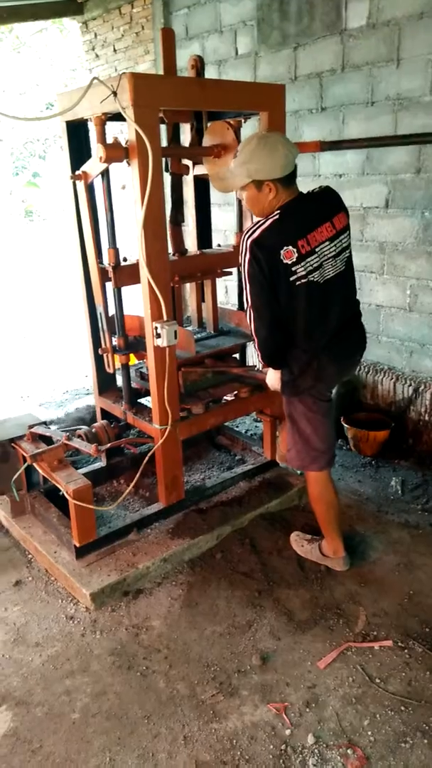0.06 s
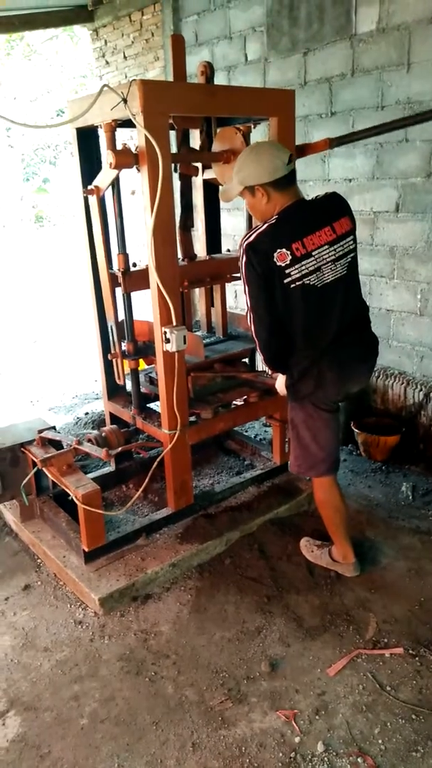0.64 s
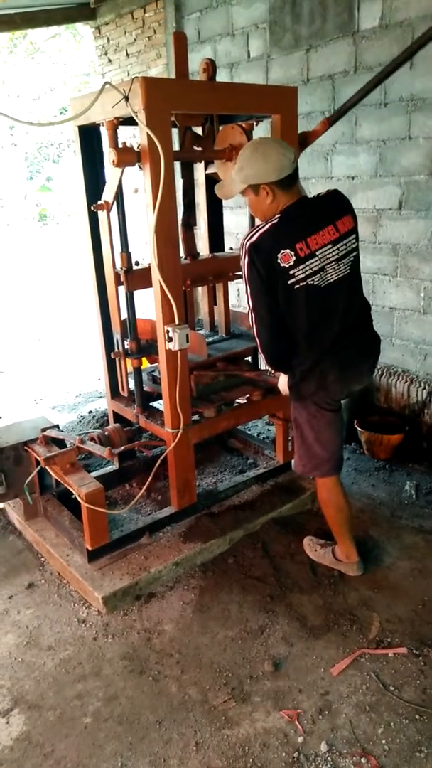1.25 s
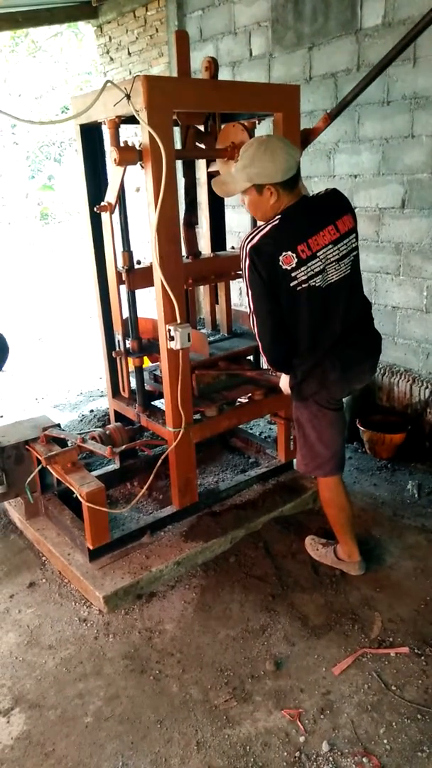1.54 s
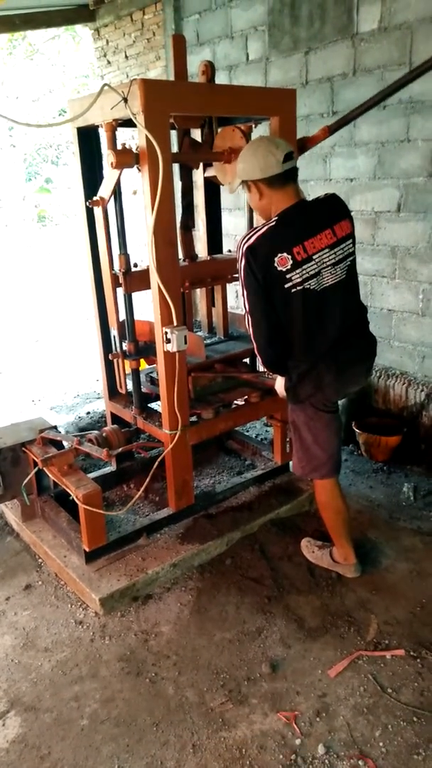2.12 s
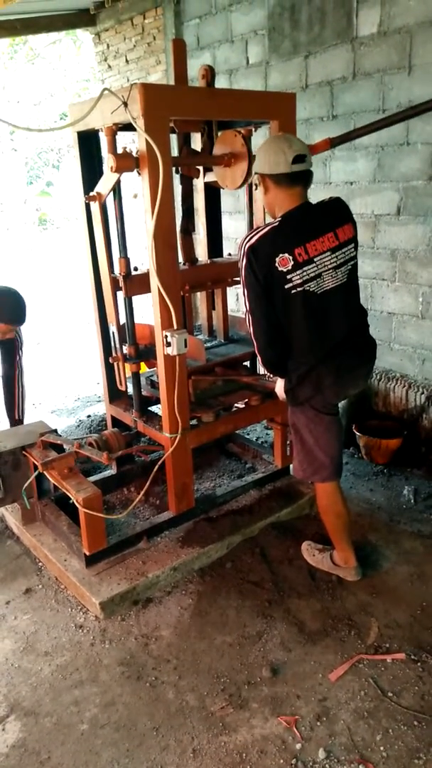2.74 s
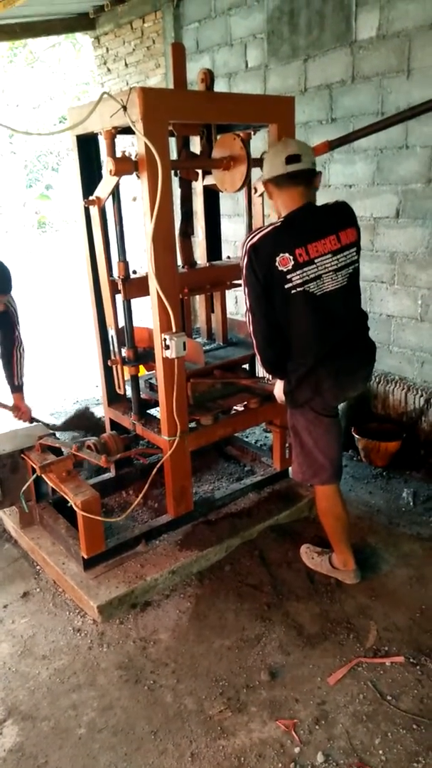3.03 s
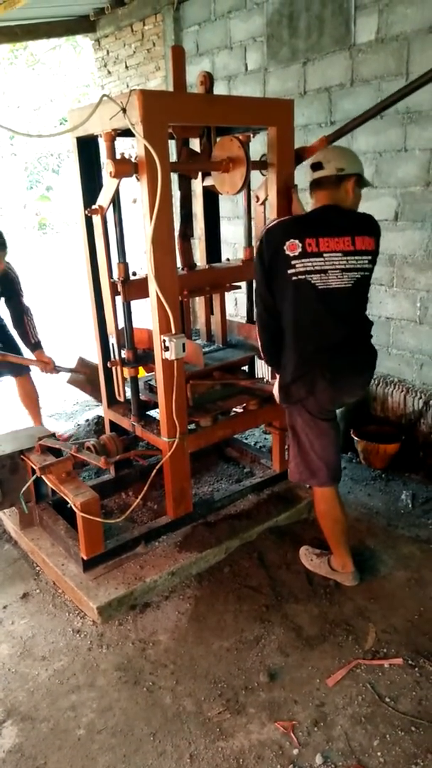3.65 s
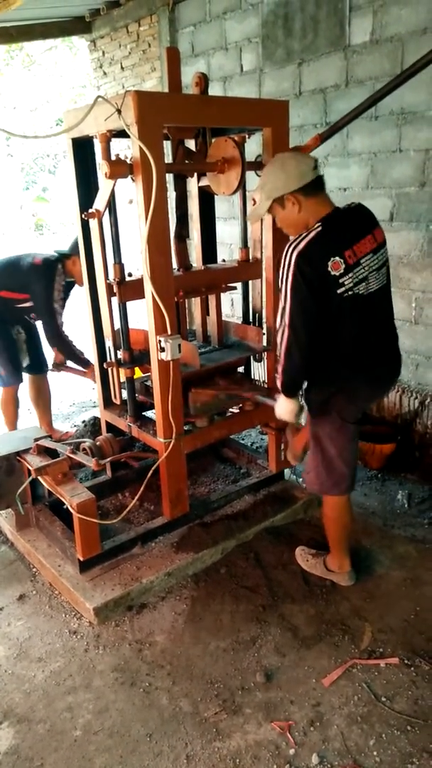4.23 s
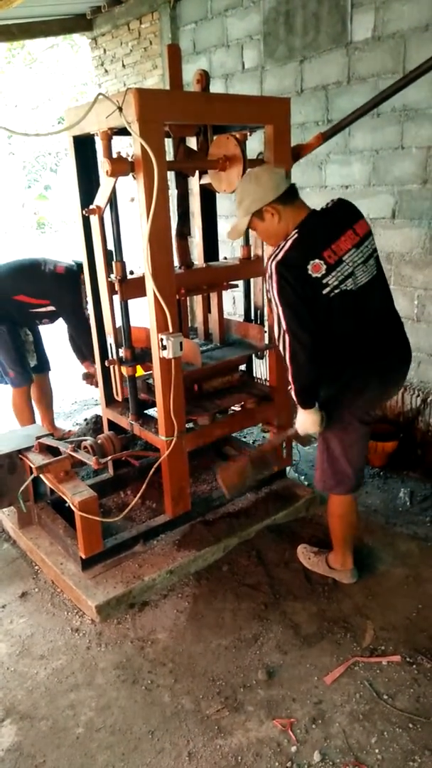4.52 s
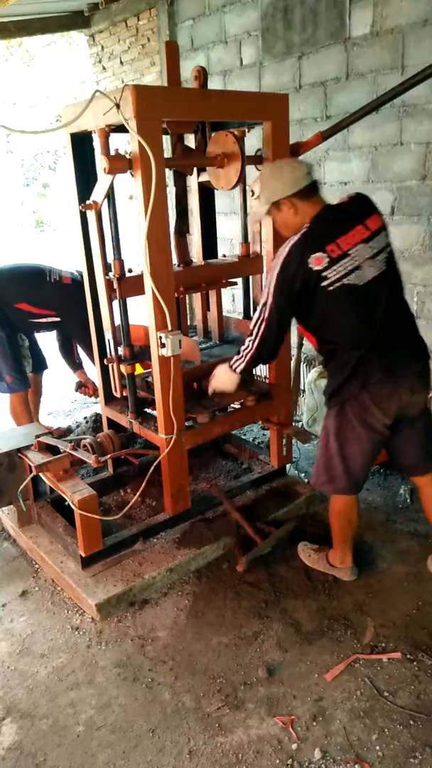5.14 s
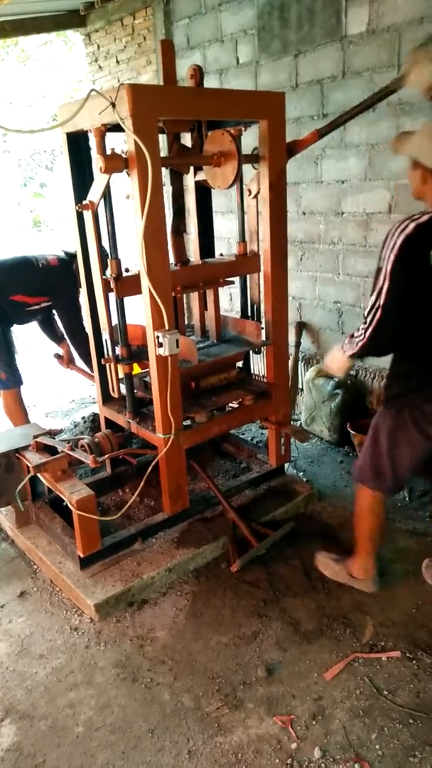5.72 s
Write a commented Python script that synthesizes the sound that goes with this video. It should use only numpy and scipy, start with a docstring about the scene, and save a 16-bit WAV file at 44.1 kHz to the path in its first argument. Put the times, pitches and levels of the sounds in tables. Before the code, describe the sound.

At the start a lever squeaks faintly and steel scrapes on gritty steel, ending in a sharp clank at about 0.45 seconds. Straight away a concrete block machine begins to vibrate: a loud, fast, even rattling buzz of clashing steel parts, with a deep drumming hum and a ringing frame. It speeds up slightly in the first half second, then holds steady, with occasional brighter clangs and a loose plate jangling around 3 seconds. At about 4.5 seconds the shaking dies, leaving a few slowing, fading knocks until 5.1. At 5.2 a hand tool thuds on the earth floor and bounces. Faint shovel scrapes, sandal steps and crunching grit continue to about 5.8 seconds. Soft outdoor noise lies under everything, the shed adds a short echo, and the loudest peaks overload the phone microphone.

```python
"""A concrete block machine shakes in a shed: its off-centre shaft throws a steel mould against a table many
times a turn, so loose parts clatter, the table drums and the frame rings. Before it starts, steel scrapes
and a lever squeaks and clanks. It runs for four seconds and coasts down in a few slowing knocks. Then a
hand tool drops, and someone shovels and steps back. Soft outdoor noise lies under it all, and the loudest
peaks overload the phone."""
import sys
import numpy as np
from scipy import signal
from scipy.fft import rfft, irfft, next_fast_len
from scipy.io import wavfile
from scipy.ndimage import uniform_filter1d

SR = 44100
rng = np.random.default_rng(int(sys.argv[2]) if len(sys.argv) > 2 else 0)


def put_to_file(sound):
    """Save the sound as 16-bit audio at rate SR, in the file named by the first command-line argument."""
    columns = np.atleast_2d(sound).T  # one column per channel
    safe = np.clip(columns, -1, 1)
    whole_steps = np.round(safe * 32767)
    wavfile.write(sys.argv[1], SR, whole_steps.astype(np.int16))


N = 254456
TIME = np.arange(N) / SR
RING_TIME = TIME[:SR // 2]  # half a second for a struck body to ring

BOUNCE_S, MOTOR_OFF_S, SETTLE_S = 0.53, 4.13, 4.531  # bouncing starts, power is cut, bouncing dies
ATTACK_S, RELEASE_S = 0.044, 0.063  # how quickly the shaking comes and goes
START_HZ, RUN_HZ = 21.756, 25.86  # shaft turns per second
SPIN_UP_HZ_PER_S, COAST_HZ_PER_S = 9.0, 8.3
HUM_DB, HUM_DB_PER_HZ = -26, -3.5  # hum at full speed, and its change for each turn per second less

# How hard the mould shakes. Each row: time in seconds, clatter in dB, its extra treble in dB, drum in dB.
SHAKING = [(0.53, -13.5, 0.5, -27.5), (0.66, -12, 0.5, -23), (1.0, -12.5, -0.5, -21.5),
           (1.22, -13.5, 0, -27.5), (1.33, -12.5, 1.5, -24.5), (1.5, -13.5, 0, -21.5),
           (1.62, -14, 0.5, -21.5), (1.69, -13, 0.5, -21.5), (2.35, -11.5, 0, -25.5), (2.41, -13, -2, -18),
           (2.48, -13, -0.2, -22), (3.65, -13, -0.8, -24.5), (4.05, -11, -0.2, -20),
           (4.43, -12.5, 1, -24.5), (4.54, -13.5, -0.5, -25.5)]
def vibrator():
    """The mould hammers on the table: loose parts clash, the frame clangs, the table drums and hums."""
    speed = shaft_speed()
    turns = np.cumsum(speed * (1 + .0015 * drift(5))) / SR
    bouncing = hold(BOUNCE_S, SETTLE_S, ATTACK_S, RELEASE_S)
    times, clatter_db, treble_db, drum_db = np.transpose(SHAKING)
    shake = bouncing * undb(np.interp(TIME, times, clatter_db) + .35 * drift(13))
    drum = bouncing * undb(np.interp(TIME, times, drum_db) + 0.5 * drift(14))
    clatter = undb(2) * rattle(turns, shake, parts=5) + undb(1) * chimes(turns, shake)
    treble = colour(clatter, [(4000, 0), (20000, 0)])
    clatter += (undb(np.interp(TIME, times, treble_db)) - 1) * treble
    hum_gain = bouncing * undb(HUM_DB + HUM_DB_PER_HZ * (RUN_HZ - speed))
    table = undb(-1.5) * drumming(turns, drum, corners=3) + hum_gain * hum(turns)
    return clatter + wall_clang(turns) + frame_clang() + table


def shaft_speed():
    """Turns per second: the shaft speeds up, runs steadily, then coasts with the motor off."""
    rising = START_HZ + SPIN_UP_HZ_PER_S * (TIME - BOUNCE_S)
    slowing = COAST_HZ_PER_S * np.maximum(TIME - MOTOR_OFF_S, 0)
    return np.maximum(np.minimum(rising, RUN_HZ) - slowing, 1)


def contacts(turns, per_turn, jitter_s, scatter_db, lift_db):
    """Blows return at the same shaft angles, never quite alike, hardest at both ends of the stroke."""
    angles = (np.arange(per_turn) + rng.uniform(0, 1, per_turn)) / per_turn
    at_turn = (np.arange(round(30 * N / SR))[:, None] + angles).ravel()  # more turns than needed
    late, hard = rng.standard_normal((len(at_turn), 2)).T
    stroke_db = lift_db * (np.cos(4 * np.pi * at_turn) + .5 * np.cos(2 * np.pi * at_turn))
    sign = np.resize(rng.choice([-1, 1], per_turn), len(at_turn)) * (at_turn < turns[-1])
    times = np.interp(at_turn, turns, TIME) + jitter_s * late
    return clicks(times, sign * undb(scatter_db * hard + stroke_db))


# The tone of the mould's steel plates. Each row: frequency in Hz, level in dB.
PLATE_COLOUR = [(300, -32), (520, -9), (660, -5), (1000, -4.5), (1350, -5.5), (1800, -3.5), (2800, -5.5),
                (4200, -4.5), (5200, -5), (6100, -6), (6900, -11.5), (7600, -21), (9000, -22.5)]
def rattle(turns, shake, parts):
    """Several loose parts each clash in their own pattern and from their own place."""
    out = 0
    for _ in range(parts):
        force = contacts(turns, per_turn=7, jitter_s=.0015, scatter_db=3, lift_db=1.5)
        plates = wash(PLATE_COLOUR, t60=0.15, shed_db=-4.5, shed_t60=0.45, shared=0.14)
        out += driven(force, shake, plates + undb(-8) * ring(MOULD_NOTES, spread=1.3))
    return out / np.sqrt(parts)


# The notes of the mould's loose parts. Each row: pitch in Hz, level in dB, ring time in seconds.
MOULD_NOTES = [(955, -19, .06), (1085, -19.5, .045), (1135, -18.5, .045), (1400, -21, .06),
               (1585, -22, .06), (1700, -21, .05), (1795, -22, .05), (2075, -18.5, .05), (2322, -20.5, .09),
               (2726, -18, .09), (2814, -21, .08), (2905, -21, .07), (3076, -19.5, .07), (3323, -23, .08),
               (3540, -21, .05), (3649, -20.5, .11), (4520, -20, .05), (5060, -22, .05), (5704, -22, .08),
               (5945, -20, .03)]
def chimes(turns, shake):
    """Each loose part rings on its own note, now clearer, now fainter, as it shifts about."""
    out = 0
    for hz, db, t60 in MOULD_NOTES:
        force = contacts(turns, per_turn=4, jitter_s=.002, scatter_db=4, lift_db=1.5)
        shifting = undb(db + 2.5 * drift(5))
        out += driven(force, shake * shifting, ring([(hz, 0, t60)], spread=1.58))
    return out


# The table's deep tone. Each row: frequency in Hz, level in dB.
TABLE_COLOUR = [(25, -37), (50, -29), (75, -18), (135, -8), (170, -5), (205, -21), (245, 7.5), (320, 2),
                (400, 5.5), (480, 1), (570, -1), (700, -37)]
# Its clearest notes. Each row: pitch in Hz, level in dB, ring time in seconds.
TABLE_NOTES = [(246, 0, .16), (284, -2, .16), (387, -1, .16), (572, -1, .14)]
def drumming(turns, drum, corners):
    """The heavy blows shake the table at its corners."""
    out = 0
    for _ in range(corners):
        force = contacts(turns, per_turn=6, jitter_s=0.0011, scatter_db=3, lift_db=6)
        boom = wash(TABLE_COLOUR, t60=0.079, shed_db=-5, shed_t60=0.28, shared=0.95)
        out += driven(force, drum, boom + undb(-8) * ring(TABLE_NOTES, spread=0.58))
    return out / np.sqrt(corners)


# The tones in the table's hum. Each row: multiple of the shaft speed, level in dB.
HUM_TONES = [(3, -7.3), (4, -15), (5, -13), (6, -15), (7, -7), (8, -13), (9, -4), (10, -4), (11, -5),
             (12, -6), (13, -4), (14, -5), (15, -3), (16, -7), (17, -8), (21, -10), (22, -8)]
# When one tone stands out. Each row: its multiple, start in seconds, length in seconds.
HUM_SWELLS = [(11, 0.95, 1.1), (9, 1.5, 1.5), (21, 2.25, 1.2), (13, 2.35, 0.5), (14, 2.95, 0.45),
              (15, 3.8, 0.22), (11, 3.85, 0.25)]
def hum(turns, swell_db=7.5):
    """The table hums at multiples of the shaft speed; at listed times, single tones swell."""
    out = 0
    for multiple, db in HUM_TONES:
        swell = sum(hold(start, start + length, .08, .08)
                    for which, start, length in HUM_SWELLS if which == multiple)
        gain = undb(db + swell_db * swell + 2.2 * drift(12))
        out += gain * np.sin(2 * np.pi * (multiple * turns + rng.random()))
    return unit(out)


# The notes of the mould's thin walls. Each row: pitch in Hz, level in dB, ring time in seconds.
WALL_NOTES = [(2726, -1, .13), (2814, 0, .13), (2905, -1.5, .1), (3076, -4, .08), (3540, -5, .08),
              (3649, -4, .12)]
# When they clang. Each row: start in seconds, length in seconds, level in dB.
WALL_CLANGS = [(0.58, .42, -22.5), (1.36, .18, -24.5), (1.88, .25, -24.5), (3.42, .35, -22),
               (4.2, .36, -21.5)]
def wall_clang(turns):
    """Now and then the mould's walls strike the guides a few times a turn and ring brightly."""
    force = contacts(turns, per_turn=4, jitter_s=.0015, scatter_db=4, lift_db=2)
    striking = strokes(WALL_CLANGS, slope_db_per_s=0, edge_s=.05)
    return driven(force, striking, ring(WALL_NOTES, spread=1.2))


# The steel frame's notes. Each row: pitch in Hz, level in dB, ring time in seconds.
FRAME_NOTES = [(776, 0, .5), (2318, -20, .5), (2885, -22, .3), (3063, -17, .15), (3500, -21, .25)]
# When it rings out or is held back. Each row: start in seconds, length in seconds, change in dB.
FRAME_CHANGES = [(0.675, .08, 8.5), (0.82, .11, 2), (1.01, .09, -5), (1.32, .15, 6.5), (1.62, .05, -6),
                 (1.76, .24, 3), (2.61, .25, -7), (3.14, .18, 2.5), (3.51, .11, 4.5), (3.81, .04, 6.5),
                 (4.0, .23, 5.5), (4.34, .11, 3.5)]
def frame_clang(start_s=0.462, level_db=-25.5):
    """The frame rings roughly, louder while the mould catches it, fainter while the mould leans on it."""
    damping = np.exp(-RING_TIME / .09)  # the mould rests against the frame
    tone = play(grains(300, 1.6), ring(FRAME_NOTES, spread=0.16) * damping)
    strength = np.sqrt(uniform_filter1d((tone ** 2).mean(0), SR // 20) + np.mean(tone ** 2) / 20)
    change_db = sum(db * hold(start, start + length, .022, .022) for start, length, db in FRAME_CHANGES)
    shaken = undb(level_db + change_db + 0.93 * drift(17)) * hold(start_s, SETTLE_S, 0.017, RELEASE_S)
    flicker = undb(1.8 * drift(45) - .3)
    return tone / strength * flicker * shaken


# A loose plate's notes. Each row: pitch in Hz, level in dB, ring time in seconds.
JANGLE_NOTES = [(1490, -5, 0.078), (1588, 4.5, 0.056), (1646, -2, 0.082), (1750, 1, 0.038)]
# When it jangles. Each row: start in seconds, length in seconds, level in dB.
JANGLE_TIMES = [(2.7, 0.56, -22.5), (3.62, 0.37, -25)]
def jangle():
    """One plate works loose and buzzes along with the mould."""
    taps = grains(per_s=400, scatter_db=8.4)
    loose = strokes(JANGLE_TIMES, slope_db_per_s=-4, edge_s=0.12)
    return driven(taps, loose, ring(JANGLE_NOTES, spread=1))


# The last knocks. Each row: start in seconds, clatter level in dB, clatter length in seconds,
# frame ring level in dB, seconds until the ring is damped.
LAST_KNOCKS = [(4.654, -18, 0.01, -18.5, 0.032), (4.733, -15.5, 0.008, -21, 0.067),
               (4.821, -32, 0.011, -30, 0.03), (4.914, -29.5, 0.03, -31, 0.07),
               (5.017, -43, 0.022, -38.5, 0.029), (5.124, -48.5, 0.012, -36.5, 0.015)]
# The tone of the seat that the mould falls on. Each row: frequency in Hz, level in dB.
SEAT_COLOUR = [(200, -10), (500, -8.5), (820, 5), (1200, -4), (1900, -3.5), (2400, 7.5), (3200, 5.5),
               (4200, 4), (5200, 2), (6200, 3), (7200, -7), (9000, -20)]
def knocks():
    """As the shaft slows, the mould falls in single knocks that crack, clatter and ring the frame."""
    bursts, blows, clangs = 0, 0, 0
    for start, clatter_db, clatter_s, ring_db, ring_s in LAST_KNOCKS:
        bursts += undb(clatter_db) * hold(start, start + clatter_s, attack_s=0.00055, release_s=0.025)
        blows += clicks([start], [undb(clatter_db)])
        damping = np.exp(-np.maximum(RING_TIME - ring_s, 0) / 0.019)  # the mould stops the ring
        clangs += play(clicks([start], [undb(ring_db)]), ring(FRAME_NOTES, spread=0.1) * damping)
    seat = wash(SEAT_COLOUR, t60=0.046, shed_db=-14.5, shed_t60=0.39, shared=0.098)
    seat += undb(-12.5) * ring(MOULD_NOTES, spread=2.5)
    clatter = undb(0.5) * driven(grains(2500, 3.5), bursts, seat)
    crack = undb(1) * play(blows, seat)
    chatter = undb(2.2 * drift(110) - .3)  # the mould chatters against the ringing frame
    return clangs * chatter + crack + clatter


# The lever hits its stop. Each row: start in seconds, level in dB.
LEVER_HITS = [(0.453, -23), (0.4563, -13), (0.463, -20.5), (0.482, -23.5)]
# The lever's notes. Each row: pitch in Hz, level in dB, ring time in seconds.
LEVER_NOTES = [(776, 0, .2), (958, 7.5, 0.1), (1120, 5, .1), (1655, 3, .12), (1806, 6, 0.08),
               (2034, 11, 0.065), (2220, 9, 0.07), (3649, 0, .15)]
def lever_clank():
    """The lever clanks against its stop and jolts the machine's steel."""
    times, db = np.transpose(LEVER_HITS)
    plates = wash(PLATE_COLOUR, t60=0.17, shed_db=4.5, shed_t60=0.26, shared=0.17)
    body = undb(-7) * plates + undb(1.5) * ring(LEVER_NOTES, spread=0.86)
    return play(clicks(times, undb(db)), body)


# The whines of the lever's rod. Each row: pitch in Hz, level in dB compared with the squeak.
ROD_WHINES = [(645, -8), (1330, -13), (2460, -15)]
def lever_squeak(end_s=0.23, start_hz=1420, rise_hz_per_s=260):
    """The lever's pivot squeaks on a slowly rising note, and its rod sings along faintly."""
    pitch = (start_hz + rise_hz_per_s * np.minimum(TIME, end_s)) * (1 + .009 * drift(150))
    pivot = np.sin(2 * np.pi * np.cumsum(pitch) / SR)
    rod = sum(undb(db) * np.sin(2 * np.pi * hz * TIME + 0.54 * drift(66)) for hz, db in ROD_WHINES)
    gain = hold(0, end_s, .01, .02) * undb(-50.5 + 2.5 * drift(110))
    return np.sqrt(2) * (pivot + rod) * gain


# Pushes on the sliding steel. Each row: start in seconds, length in seconds, starting level in dB.
SLIDE_PUSHES = [(0.03, 0.072, -55), (0.276, 0.11, -34.5), (0.415, 0.059, -42)]
# The tone of its scrape. Each row: frequency in Hz, level in dB.
STEEL_COLOUR = [(100, -25), (200, -6), (320, 7), (500, -4), (950, 2), (1300, 1), (2000, -2), (2800, -6.5),
                (3900, -4), (4800, -8), (5800, -3.5), (7400, -11.5), (9000, -20)]
# Its notes. Each row: pitch in Hz, level in dB, ring time in seconds.
STEEL_NOTES = [(1680, 3, 0.035), (2050, -1, 0.046), (3030, -5, .06), (3880, -1, 0.046), (5580, 0, .052)]
def slide():
    """Steel slides on gritty steel, harder as each push goes on, and sings faintly."""
    pushing = strokes(SLIDE_PUSHES, slope_db_per_s=129, edge_s=0.012)
    singing = driven(grains(1100, 4.3), pushing, ring(STEEL_NOTES, spread=1))
    scraping = scrape(pushing, STEEL_COLOUR, grains_per_s=2600, scatter_db=3.7)
    return undb(-1) * scraping + undb(-9) * singing


# The tool lands and bounces. Each row: start in seconds, level in dB.
TOOL_HITS = [(5.2005, -21), (5.207, -25.5), (5.214, -26), (5.223, -22.5), (5.244, -30.5), (5.264, -31)]
# The tone of its thud. Each row: frequency in Hz, level in dB.
TOOL_COLOUR = [(100, -28), (200, -18), (260, -5), (380, -13), (540, 1), (720, -12), (1000, -8), (1400, -16),
               (2000, -14), (2800, -15), (3400, -30), (7000, -37)]
# Its notes. Each row: pitch in Hz, level in dB, ring time in seconds.
TOOL_NOTES = [(255, 1, .18), (453, -11, .08), (549, 1.5, .13), (641, -12, .12), (980, -10, .15),
              (1340, -7.5, .13), (1712, -12, .11), (2094, -18, .1), (2455, -18, .1), (2800, -19, .1)]
def dropped_tool():
    """A long-handled tool thuds on the earth floor and bounces."""
    times, db = np.transpose(TOOL_HITS)
    thud = wash(TOOL_COLOUR, t60=.09, shed_db=-19, shed_t60=.3, shared=.7)
    force = soften(clicks(times, undb(db)), contact_s=0.00025)
    return play(force, undb(-5) * thud + undb(-3.5) * ring(TOOL_NOTES, spread=0.61))


# Shovel strokes. Each row: start in seconds, length in seconds, starting level in dB.
DIGS = [(5.13, 0.12, -43), (5.32, 0.018, -42), (5.445, 0.1, -43.5), (5.62, 0.03, -44.5),
        (5.71, 0.07, -47.5)]
# Their tone. Each row: frequency in Hz, level in dB.
DIG_COLOUR = [(200, -5), (500, -10), (900, 7), (1400, -9), (1850, 10), (2300, -2), (3500, -11), (6000, -34),
              (8000, -42)]
def shovel():
    """A shovel scrapes through the concrete mix, easing off in each stroke."""
    digging = strokes(DIGS, slope_db_per_s=-32, edge_s=0.03)
    return scrape(digging, DIG_COLOUR, grains_per_s=900, scatter_db=4.8)


# Footsteps. Each row: start in seconds, level in dB.
FOOTFALLS = [(5.327, -42), (5.435, -39.5), (5.585, -41.5), (5.728, -60)]
# Their dull tone. Each row: frequency in Hz, level in dB.
EARTH_COLOUR = [(40, 6), (130, -4), (280, 12), (560, 1), (900, -15), (1700, -8), (3000, -11), (7000, -27)]
def steps():
    """Sandals pat the earth floor as the worker steps back."""
    times, db = np.transpose(FOOTFALLS)
    earth = wash(EARTH_COLOUR, t60=0.14, shed_db=-24, shed_t60=.3, shared=0.21)
    return play(soften(clicks(times, undb(db)), contact_s=.0002), earth)


# Crunches of grit. Each row: start in seconds, length in seconds, starting level in dB.
GRIT_CRUNCHES = [(5.21, 0.06, -50), (5.425, 0.085, -53), (5.725, 0.04, -58)]
# Their bright tone. Each row: frequency in Hz, level in dB.
GRIT_COLOUR = [(2800, 3), (4000, 6), (5200, -3), (6300, 5), (7500, -18)]
def crunch():
    """Loose grit crunches under the dropped tool and the sandals."""
    pressing = strokes(GRIT_CRUNCHES, slope_db_per_s=-3, edge_s=0.011)
    return scrape(pressing, GRIT_COLOUR, grains_per_s=600, scatter_db=5.5)


# The tone of the open air. Each row: frequency in Hz, level in dB.
OUTDOOR_COLOUR = [(25, -29), (50, -5), (120, -1), (200, -6), (380, -11.5), (600, -10), (950, -8.5),
                  (1600, -7.5), (2600, -21.5), (4000, -23.5), (5600, -23.5), (7400, -36), (9000, -66)]
def outdoors():
    """Soft outdoor noise comes through the open side of the shed."""
    return undb(-43.5 + 0.37 * drift(8)) * unit(colour(stereo_noise(N, shared=0.64), OUTDOOR_COLOUR))


def scrape(gain, outline, grains_per_s, scatter_db):
    """Grit catches and breaks under something sliding or pressing on it."""
    grit = grains(grains_per_s, scatter_db)
    return driven(grit, gain, wash(outline, t60=0.052, shed_db=0, shed_t60=0.059, shared=0.17))


def wash(outline, t60, shed_db, shed_t60, shared):
    """Countless notes blur into noise, then the shed echoes; t60 is the seconds to fade by 60 dB."""
    t = RING_TIME
    near = unit(colour(stereo_noise(len(t), shared), outline)) * np.exp(-np.log(1000) * t / t60)
    far = unit(colour(stereo_noise(len(t), shared / 2), outline)) * np.exp(-np.log(1000) * t / shed_t60)
    return near + undb(shed_db) * far * (1 - np.exp(-t / 0.0061))


def ring(notes, spread):
    """A struck body rings with a few clear notes; spread puts left and right out of step."""
    hz, db, t60 = np.transpose(notes)[:, :, None]
    phase = rng.uniform(0, 2 * np.pi, hz.shape) + spread * rng.standard_normal((2, *hz.shape))
    size = undb(db) / np.sqrt(t60)  # dB sets a note's share of the energy
    waves = size * np.exp(-np.log(1000) * RING_TIME / t60) * np.sin(2 * np.pi * hz * RING_TIME + phase)
    build_up = 1 - np.exp(-RING_TIME / .0005)
    return build_up * waves.sum(1) / np.sqrt(np.sum(size ** 2) / 2)


def play(force, response):
    """Every blow in the force sets off the body's response."""
    return signal.fftconvolve(force[None], response, axes=1)[:, :N]


def driven(force, gain, response):
    """A body is shaken by a force that is first evened out, then made to follow gain."""
    steady = force / np.sqrt(uniform_filter1d(force ** 2, SR // 8) + np.mean(force ** 2) / 20)
    return play(steady * gain, response / np.sqrt(np.sum(response ** 2, axis=1, keepdims=True)))


def clicks(times, sizes):
    """Sharp blows at the given times."""
    return np.bincount(np.clip(np.asarray(times) * SR, 0, N - 1).astype(int), sizes, N)


def grains(per_s, scatter_db):
    """Tiny contacts of uneven strength at random moments."""
    hits = (rng.random(N) < per_s / SR) * rng.choice([-1, 1], N)
    return hits * undb(scatter_db * rng.standard_normal(N))


def soften(force, contact_s):
    """A soft contact spreads a blow over a short push."""
    push = signal.windows.hann(max(int(contact_s * SR), 3))
    return np.convolve(force, push / push.sum(), "same")


def hold(on_s, off_s, attack_s, release_s):
    """Gain that rises to 1 at on_s, holds until off_s and dies away."""
    return np.exp(-np.maximum(on_s - TIME, 0) / attack_s - np.maximum(TIME - off_s, 0) / release_s)


def strokes(rows, slope_db_per_s, edge_s):
    """Gain for strokes that swell or ease off while they last."""
    gain = 0
    for start, length, db in rows:
        level = undb(db + slope_db_per_s * np.clip(TIME - start, 0, length))
        gain += level * hold(start, start + length, edge_s, edge_s)
    return gain


def drift(per_s):
    """Smooth random wandering, about 1 in size."""
    span = int(SR / per_s)
    stairs = np.repeat(rng.standard_normal(N // span + 1), span)
    return unit(uniform_filter1d(uniform_filter1d(stairs, span), span)[:N])


def stereo_noise(size, shared, lag_samples=17):
    """Noise at two microphones; the shared part reaches the right one a little later."""
    common, own = rng.standard_normal(size), rng.standard_normal((2, size))
    return np.sqrt(shared) * np.array([common, np.roll(common, lag_samples)]) + np.sqrt(1 - shared) * own


def colour(x, outline):
    """Shape the tone by an outline of (Hz, dB) points, falling 20 dB an octave beyond its ends."""
    hz, db = np.transpose(outline)
    size = next_fast_len(x.shape[-1], real=True)
    octave = np.log2(np.maximum(np.fft.rfftfreq(size, 1 / SR), 1))
    beyond = np.abs(octave - np.clip(octave, np.log2(hz[0]), np.log2(hz[-1])))
    gain = undb(np.interp(octave, np.log2(hz), db) - 20 * beyond)
    return irfft(rfft(x, size) * gain, size)[..., :x.shape[-1]]


def undb(db):
    """Turn decibels into a gain to multiply by."""
    return 10 ** (np.asarray(db) / 20)


def unit(x):
    """Scale to an average power of 1."""
    return x / np.sqrt(np.mean(x ** 2, axis=-1, keepdims=True))


# The left microphone is partly shaded, except near 7 kHz. Each row: frequency in Hz, change in dB.
LEFT_SHADE = [(10, -5), (150, -7), (500, -5.5), (3000, -5), (5500, -5), (7200, 1.5), (22000, -8)]
def scene():
    """The machine, the work around it and the open air, louder on the right."""
    machine = vibrator() + jangle() + knocks() + lever_squeak() + lever_clank() + slide()
    work = shovel() + crunch() + dropped_tool() + steps()
    left, right = undb(2) * (machine + work + outdoors())
    return np.array([colour(left, LEFT_SHADE), right])


def record(dry):
    """The phone dulls the treble, rounds and clips the peaks, and cuts everything above 15.2 kHz."""
    dull = colour(dry, [(10, 0), (6800, 0), (7600, -3), (8100, -9), (9200, -6), (10200, -24),
                        (14000, -40)])
    rounded = dull / (1 + (dull / 1.15) ** 8) ** (1 / 8)
    low_pass = signal.ellip(8, .2, 70, 15200, fs=SR, output="sos")
    return signal.sosfilt(low_pass, np.clip(rounded, -1, 1))


dry = scene()
out = record(dry)
put_to_file(out)
```